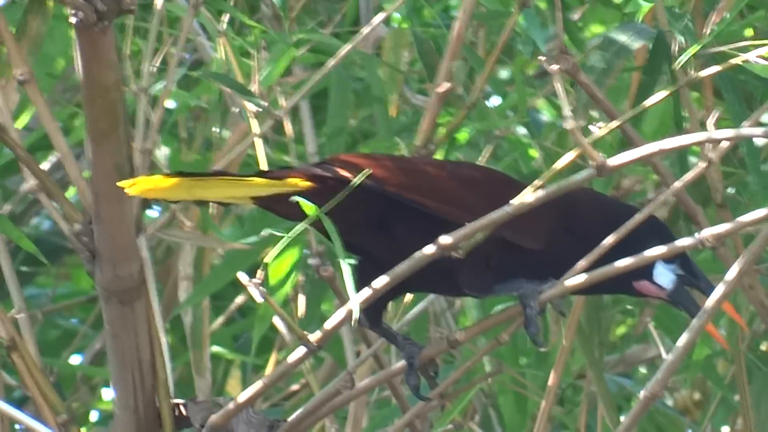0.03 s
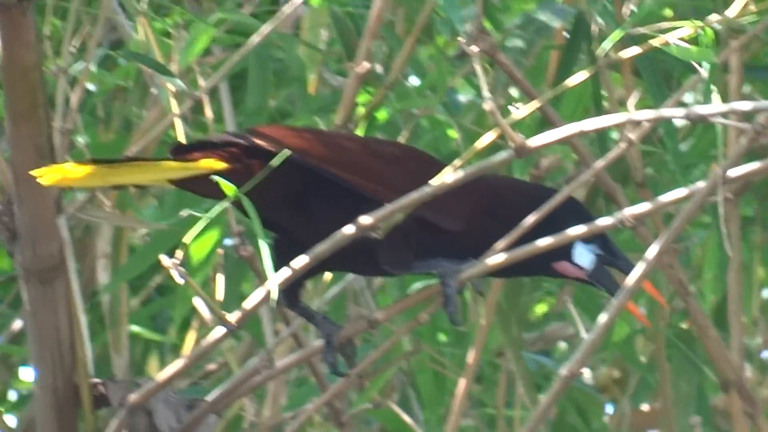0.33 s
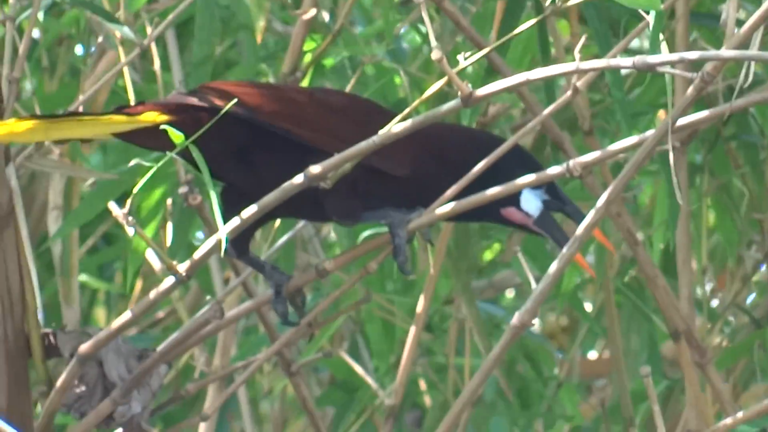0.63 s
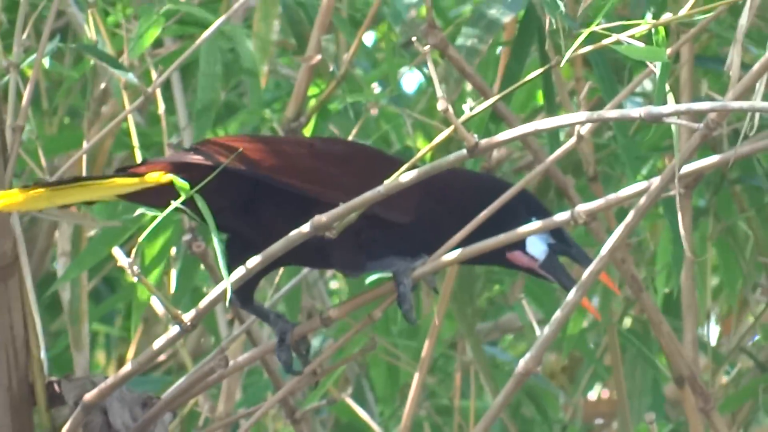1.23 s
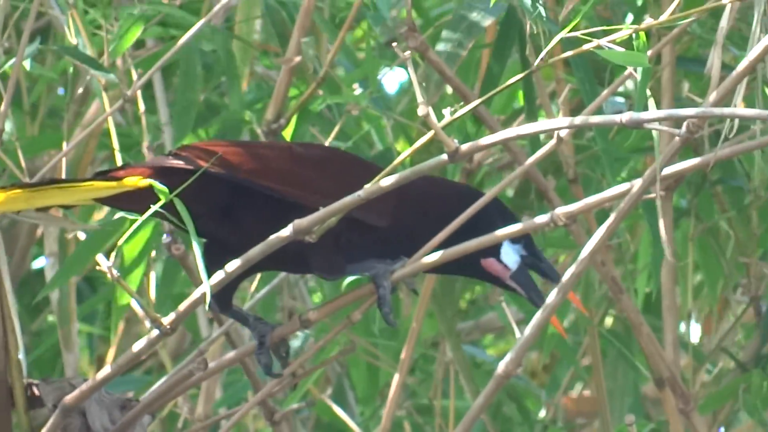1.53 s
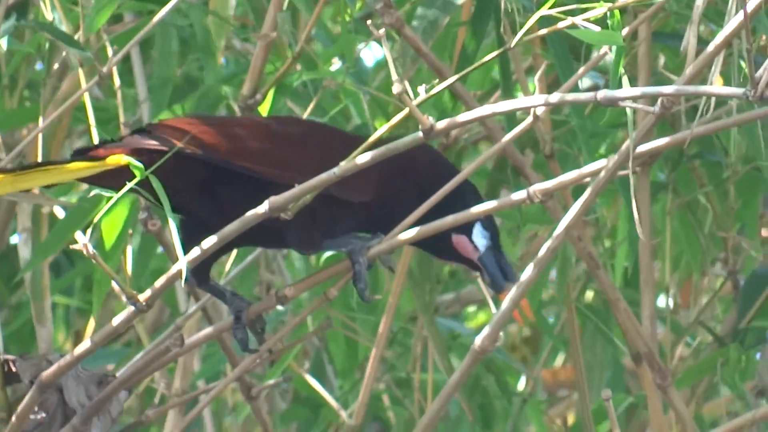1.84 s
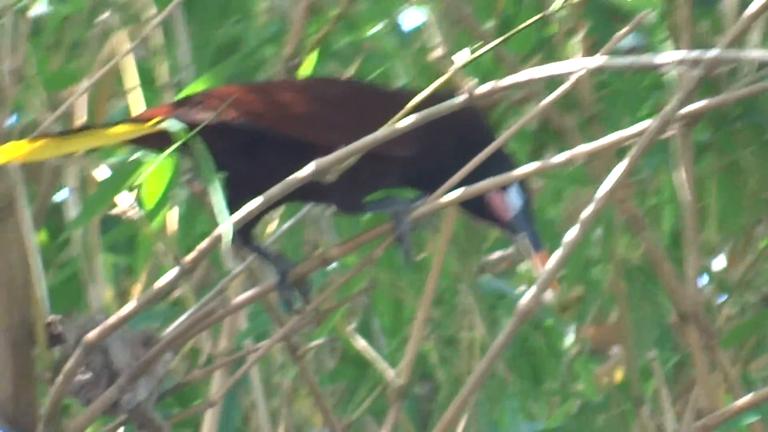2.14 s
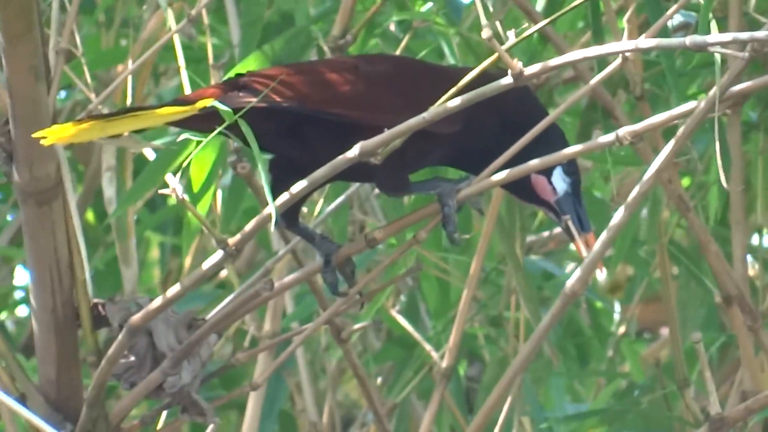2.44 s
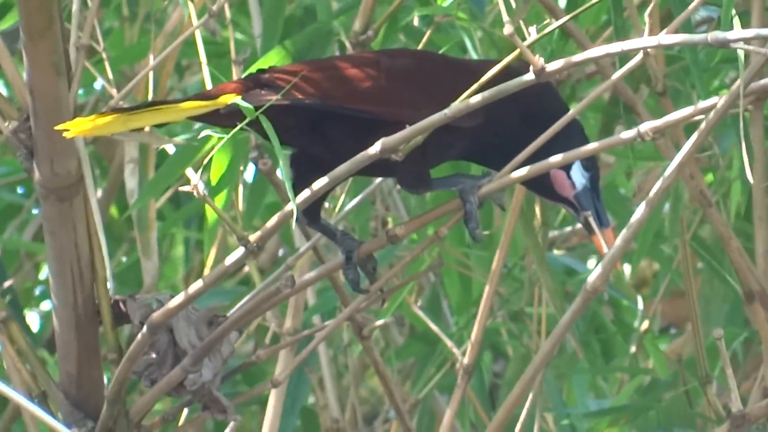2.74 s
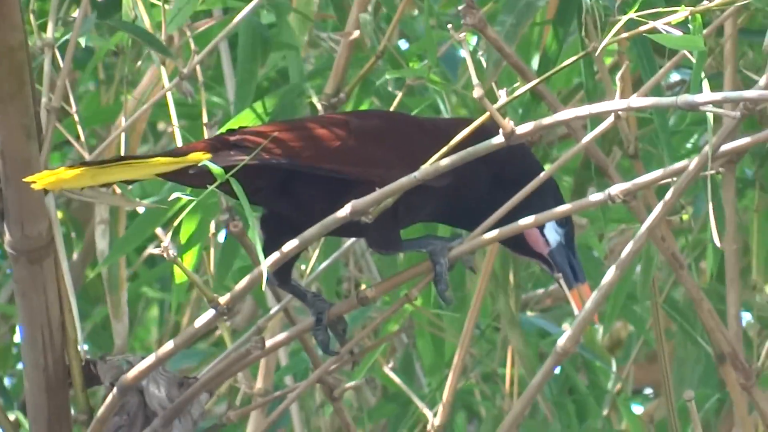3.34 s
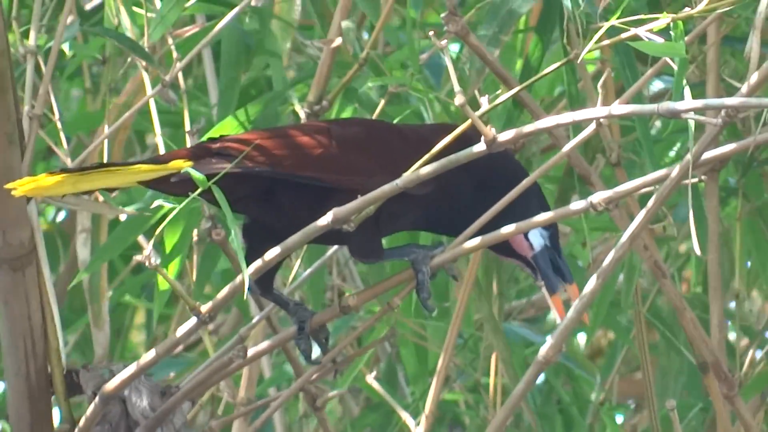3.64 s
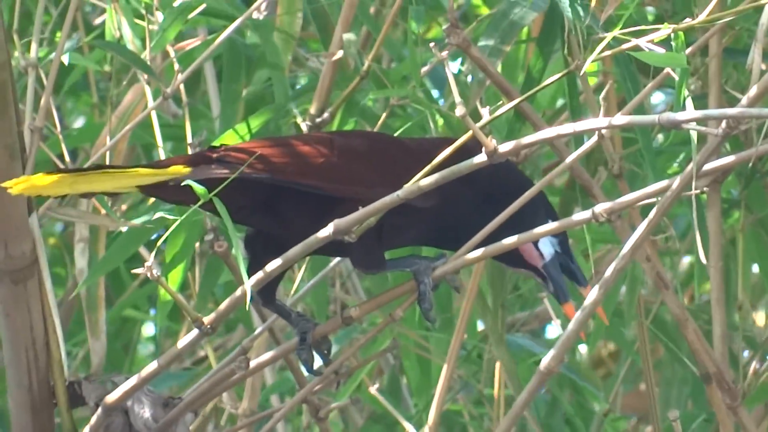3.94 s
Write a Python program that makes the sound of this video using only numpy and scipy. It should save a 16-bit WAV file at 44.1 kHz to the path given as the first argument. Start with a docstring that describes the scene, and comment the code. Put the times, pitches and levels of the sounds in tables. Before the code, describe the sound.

A steady low outdoor hush fades in at once and holds for four seconds, with a faint far engine drone. Leaves rustle softly from 0.6 to 1.6 seconds, with one brief low hoot near 1.4 and occasional dull distant knocks. Small birds give thin high whistles around 1.7 and 2.7 seconds, faint nasal squeaks from 3.6, and a short sharp trill at 3.9, lightly echoing in the thicket.

```python
"""A bamboo thicket in a garden.

An even hush of broadband noise and the drone of distant traffic fade in together. One far engine, a set of
harmonics of its firing rate, eases off and slowly picks up again. Leaves rustle in brief bursts of noise among
dull far-off knocks and one low hoot. Small birds give thin whistles (pure tones), a faint lisp, nasal squeaks
(harmonic stacks) and a sharp trill, all scattered by the thicket."""
import sys
import numpy as np
from scipy import signal
from scipy.fft import rfft, irfft
from scipy.io import wavfile

SR = 44100
rng = np.random.default_rng(int(sys.argv[2]) if len(sys.argv) > 2 else 0)


def master(y):
    """Save y as 16-bit WAV."""
    cut = np.clip(np.atleast_2d(y).T, -1, 1)
    pcm = np.round(cut * 32767)  # scale
    wavfile.write(sys.argv[1], SR, pcm.astype(np.int16))


N = 176400
T = np.arange(N) / SR
FREQS = np.maximum(np.arange(N // 2 + 1) * SR / N, 1)

# Background air and traffic. Each row: frequency in Hz, relative spectral density in dB.
HUSH_SPECTRUM = [(13,-39),(24,-17),(45,-9.5),(65,-7),(85,-10),(145,-10),(200,-8),(310,-9.5),(450,-13),(720,-12),(1140,-16.5),(1550,-17),(1980,-19),(2500,-18),(3600,-21.5),(4800,-21),(5900,-26),(7700,-23.5),(9200,-27.5),(11200,-42),(13000,-44),(15000,-42.5)]
# The far engine. Each row: time in seconds, firing rate in Hz, level in dB.
ENGINE_COURSE = [(0.1,136.3,-47.5),(0.3,117.7,-50),(0.48,109,-44.5),(0.62,104.4,-56),(1.1,102,-58),(1.5,99.53,-50.5),(2.1,102.4,-45.5),(3.0,108.1,-42.5),(3.55,112,-46.5),(3.85,116.7,-46.5),(4.0,112,-49)]
# Its harmonics. Each row: multiple of the firing rate, relative level in dB.
ENGINE_ORDERS = [(1,0),(2,-10),(3,-15)]
# Traffic drones. Each row: centre in Hz, half-width in Hz, base level in dB.
DRONES = [(50,4.54,-53.5),(65.2,5.8,-57.5),(189,21,-53.5),(1244,5.6,-63.5)]
# Their rise and fall. Each row: time in seconds, gain in dB.
DRONE_GAIN = [(0.1,0.5),(0.5,1.5),(0.66,-12.5),(0.78,0),(1.2,-2),(2.1,3),(3.1,3.5),(4.0,1)]
# Far knocks. Each row: peak time and spread in seconds, centre and half-width in Hz, level in dB.
KNOCKS = [(.47,.018,175,55.56,-45),(1.497,0.013,720,231.5,-42),(1.921,.012,1010,86,-45.5),(2.295,.012,190,70,-44),(2.6,0.02,1000,299.8,-50),(3.425,.026,328,209.8,-40.5),(3.432,.026,750,378,-40.5),(3.57,0.02,557,40,-46),(3.782,.018,555,40,-48)]
# Leaf rustles. Each row: peak time and spread in seconds, level in dB.
RUSTLES = [(0.647,0.05,-43),(0.94,0.038,-45),(1.078,.025,-41),(1.222,0.036,-44.5),(1.363,0.044,-44.5),(1.495,0.021,-39.5),(1.6,.02,-48),(3.914,.005,-44),(3.979,0.0048,-40)]
# Their colour. Each row: frequency in Hz, relative spectral density in dB.
LEAF_SPECTRUM = [(300,-8),(700,-5),(1500,-4.5),(3000,-3),(4500,1),(6000,-4),(8000,-2.5),(11000,-24),(15000,-36)]
# The hoot. Its row: peak time and spread in seconds, pitch in Hz, level in dB.
HOOT = [(1.377,.021,256,-37.5)]
# Bird notes. Each row: start and length in seconds, first and last pitch in Hz, base level in dB.
WHISTLES = [(1.615,0.046,5630,5525,-47),(1.65,0.044,5420,5440,-42),(1.686,0.046,5480,5420,-39.5),(1.732,0.032,5430,5380,-47),(1.775,.07,5380,5257,-51),(1.778,.045,5120,5050,-48),(1.85,0.054,7650,7450,-56),
            (2.664,.018,5740,5910,-38.5),(2.689,0.015,6080,5650,-42),(2.699,0.0513,5680,5247,-34.5),(2.747,0.082,4410,4127,-45),(2.765,.085,8680,8170,-56.5),
            (2.86,0.027,6800,5900,-46.5),(2.855,0.042,4400,4100,-50),(3.872,.03,4710,4780,-47),(3.908,.016,6700,6950,-42)]
SQUEAKS = [(3.615,0.098,2960,3030,-46.5),(3.73,.10,1174,1170,-51),(3.801,0.0458,1448,1520,-51),(3.835,0.087,1544,1575,-48.5)]
TRILL = [(3.923,.013,7030,7110,-31.5),(3.94,0.016,7080,7157,-28),(3.959,0.017,7150,7038,-29.5),(3.992,.014,7100,7024,-46)]
# Throat resonances of the squeaks. Each row: frequency in Hz, gain in dB.
THROAT_RESPONSE = [(1150,-18),(1450,4.5),(1560,-13),(3000,-11),(4700,-3.5),(5950,-0.5),(6500,-8),(7600,2),(9200,-8),(11000,-28.5),(14000,-38)]
# Likeness of the noise at two microphones. Each row: frequency in Hz, correlation from 0 to 1.
COHERENCE = [(60,.99),(150,1),(500,0.95),(1000,0.87),(2200,0.867),(4500,0.905),(8000,0.84),(12000,1)]
# Stereo balance. Each row: frequency in Hz, level of left over right in dB.
BALANCE = [(60, 0.5), (120, 0.0), (240, -0.5), (480, -0.5), (950, -3), (1890, -5.5), (3770, -3.5),
           (7520, -2.5), (15000, 0.0)]
# Stereo phase. Each row: frequency in Hz, lead of left over right in radians.
PHASE_LEAD = [(30,-.1),(120,-0.318),(250,-0.53),(500,-0.92),(1000,-0.92),(2200,-0.67),(4000,-0.395),(8500,-0.44),(12000,-0.075)]
# The fade-in. Each row: time in seconds, gain in dB.
FADE_IN = [(0.04,-72),(0.05,-25.5),(0.07,-12.5),(0.1,-7.5),(0.2,-1.5),(0.35,-1)]

CUTOFF_HZ = 15800


def from_db(db):
    """Amplitude grows tenfold for every 20 dB."""
    return 10 ** (np.asarray(db) / 20)


def rms_one(x):
    """Dividing by the rms gives unit power."""
    return x / np.sqrt(np.mean(x ** 2) + 1e-20)


def in_time(rows):
    """Linear interpolation gives each column at every sample."""
    times, *columns = np.transpose(rows)
    return [np.interp(T, times, column) for column in columns]


def at_hz(points, hz):
    """A spectrum is interpolated on a log-frequency axis."""
    freqs, values = np.transpose(points)
    return np.interp(np.log(hz), np.log(freqs), values)


def drift(rate_hz):
    """Low-passed noise wanders at random, with rms 1."""
    return rms_one(irfft(rfft(rng.standard_normal(N)) / (1 + (FREQS / rate_hz) ** 2) * (FREQS > 1), N))


def narrow_noise(hz, width_hz):
    """A resonance selects a narrow band of noise, with rms 1."""
    return rms_one(irfft(rfft(rng.standard_normal(N)) / (1 + ((FREQS - hz) / width_hz) ** 2), N))


def banded_noise(spectrum, shared_db, patchy_db, flicker_hz):
    """Partly coherent stereo noise of rms 1 flickers in octave bands, together and singly."""
    coherence = np.clip(at_hz(COHERENCE, FREQS), 0, 1)
    mid, side = rfft(rng.standard_normal((2, N))) * from_db(at_hz(spectrum, FREQS))
    stereo = np.sqrt(1 + coherence) * mid + np.sqrt(1 - coherence) * side * [[1], [-1]]
    together_db = shared_db * drift(10.4)
    out = np.zeros((2, N))
    for low_hz in 16 * 2 ** np.arange(11):
        octave = irfft(stereo * (FREQS >= low_hz) * (FREQS < 2 * low_hz), N)
        out += octave * from_db(together_db + patchy_db * drift(flicker_hz))
    return rms_one(out)


def swell(peak_s, spread_s):
    """A Gaussian envelope rises and falls smoothly."""
    return np.exp(-.5 * ((T - peak_s) / spread_s) ** 2)


def hush():
    """Air and distant traffic add incoherently into nearly steady broadband noise."""
    return from_db(-39) * banded_noise(HUSH_SPECTRUM, shared_db=.5, patchy_db=.7638, flicker_hz=20)


def engine():
    """Periodic firing radiates harmonics of the firing rate, each wavering in level."""
    firing_hz, db = in_time(ENGINE_COURSE)
    phase = 2 * np.pi * np.cumsum(firing_hz * (1 + .00683 * drift(11.5))) / SR
    return sum(np.sqrt(2) * from_db(db + order_db + 1.6 * drift(8.5)) * np.sin(order * phase)
               for order, order_db in ENGINE_ORDERS)


def traffic():
    """Distant traffic drones in narrow noise bands that swell and dip together."""
    drones = sum(from_db(db) * narrow_noise(hz, width) for hz, width, db in DRONES)
    return from_db(in_time(DRONE_GAIN)[0]) * drones


def knocks():
    """Low bands of noise with no sharp onset are heard as dull knocks and puffs."""
    return sum(from_db(db) * swell(peak, spread) * narrow_noise(hz, width)
               for peak, spread, hz, width, db in KNOCKS)


def leaves():
    """Foliage swishes in bursts of noise, made grainy by fast amplitude modulation."""
    envelope = sum(from_db(db) * swell(peak, spread) for peak, spread, db in RUSTLES)
    return envelope * banded_noise(LEAF_SPECTRUM, shared_db=1.8, patchy_db=4, flicker_hz=180)


def hoot():
    """A low sinusoid under a short, smooth envelope is heard as a far hoot."""
    return sum(np.sqrt(2) * from_db(db) * swell(peak, spread) * np.sin(2 * np.pi * hz * T)
               for peak, spread, hz, db in HOOT)


def note(start, length, first_hz, last_hz, waver, edge_s=.0038):
    """A note's phase is the integral of its gliding pitch; its envelope ramps at both ends."""
    progress = np.clip((T - start) / length, 0, 1)
    hz = (first_hz + (last_hz - first_hz) * progress ** .8) * (1 + waver)
    envelope = np.clip(np.minimum(T - start, start + length - T) / edge_s, 0, 1)
    return 2 * np.pi * np.cumsum(hz) / SR, envelope


def whistles(notes, waver):
    """A bird's whistle is a single gliding sinusoid; short pulses of it make a trill."""
    out = np.zeros(N)
    for *glide, db in notes:
        phase, envelope = note(*glide, waver)
        out += np.sqrt(2) * from_db(db) * envelope * np.sin(phase)
    return out


def thicket(calls, t60_s=.64, delay_s=.012, echo_db=-3.5, blur_s=.00002):
    """Scattering by stems and stirring leaves adds a diffuse tail, different on each side."""
    mid, side = rng.standard_normal((2, SR)) * from_db(-60 * T[:SR] / t60_s) * (T[:SR] > delay_s)
    tail = mid + .29 * side * [[1], [-1]]
    tail /= np.sqrt(np.sum(tail ** 2) / 2)
    blurred = np.interp(T + blur_s * drift(110), T, calls)  # a wandering delay blurs the pitch
    return calls + from_db(echo_db) * signal.fftconvolve(blurred[None], tail, axes=1)[:, :N]


def lisp():
    """A very high, narrow band of noise is heard as a faint lisping call."""
    return from_db(-60) * swell(peak_s=3.37, spread_s=.06) * narrow_noise(hz=10400.5, width_hz=180)


def squeaks(waver):
    """The throat filters a harmonic source, which fast frequency modulation makes raspy."""
    out = np.zeros(N)
    rasp = .0079 * drift(498)
    for start, length, first_hz, last_hz, db in SQUEAKS:
        phase, envelope = note(start, length, first_hz, last_hz, waver + rasp)
        for k in range(1, int(CUTOFF_HZ / last_hz)):
            gain = from_db(db + at_hz(THROAT_RESPONSE, k * first_hz))
            out += np.sqrt(2) * gain * envelope * np.sin(k * phase)
    return out


def scene():
    """The sources add by superposition; only the birds echo in the thicket."""
    background = hush() + engine() + traffic() + knocks() + leaves() + hoot()
    waver = .0031 * drift(136)  # as a fraction of the pitch
    birds = whistles(WHISTLES, waver) + lisp() + squeaks(waver) + whistles(TRILL, waver)
    flutter_db = 1.8 * drift(54)
    return background + thicket(birds * from_db(flutter_db))


def record(dry):
    """Two close microphones differ in level and phase; their signal is faded in and low-passed."""
    sides = np.array([[.5], [-.5]])
    pair = from_db(sides * at_hz(BALANCE, FREQS)) * np.exp(1j * sides * at_hz(PHASE_LEAD, FREQS))
    faded = irfft(rfft(dry) * pair, N) * from_db(in_time(FADE_IN)[0])
    return signal.sosfilt(signal.ellip(12, .2, 80, CUTOFF_HZ, fs=SR, output="sos"), faded)


dry = scene()
out = record(dry)
master(out)
```